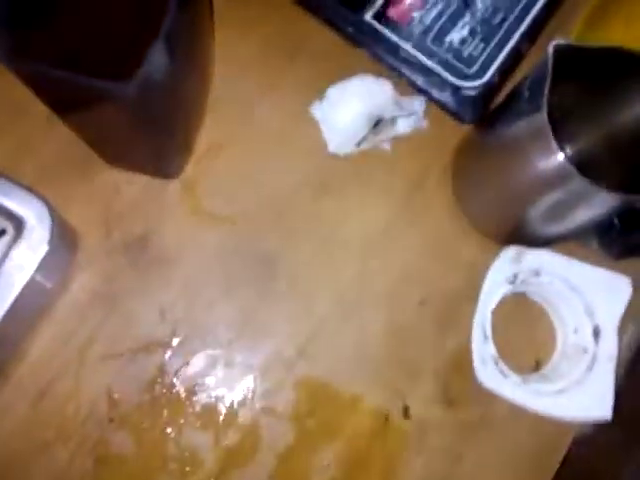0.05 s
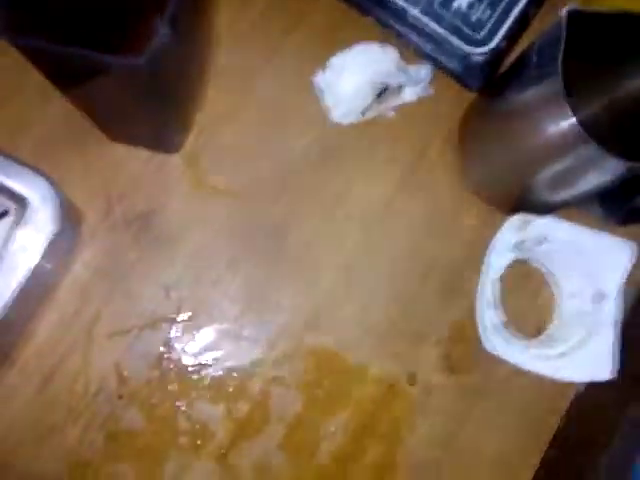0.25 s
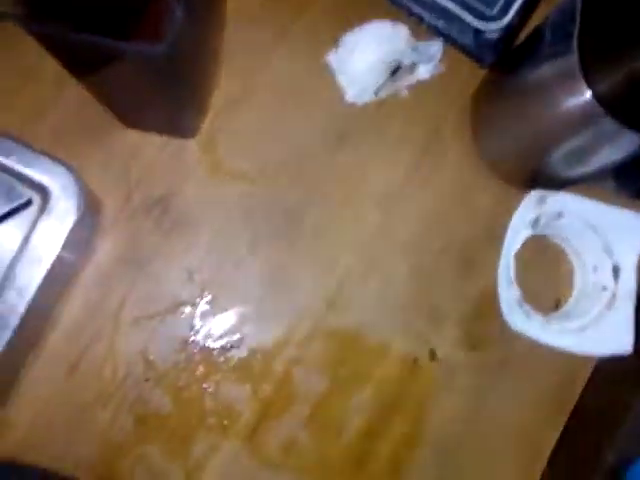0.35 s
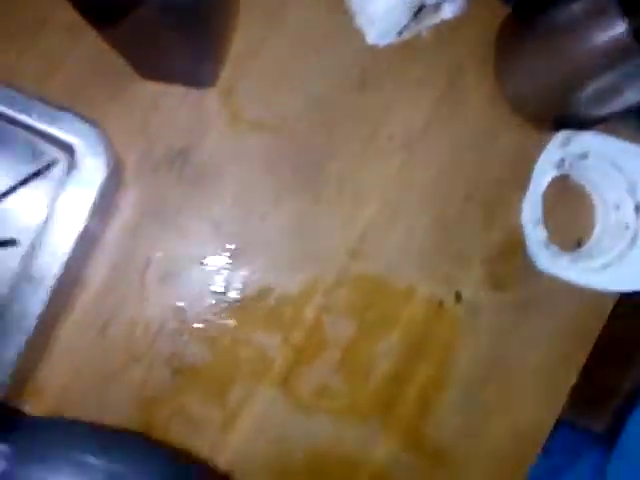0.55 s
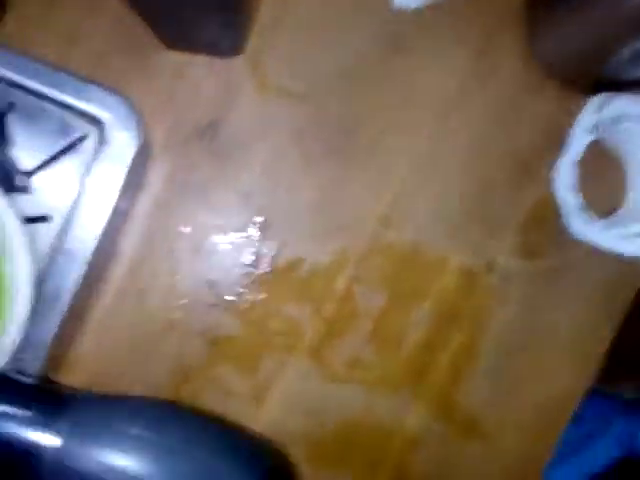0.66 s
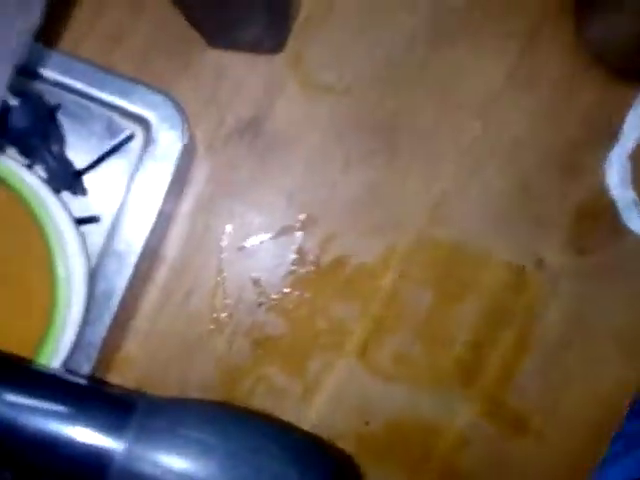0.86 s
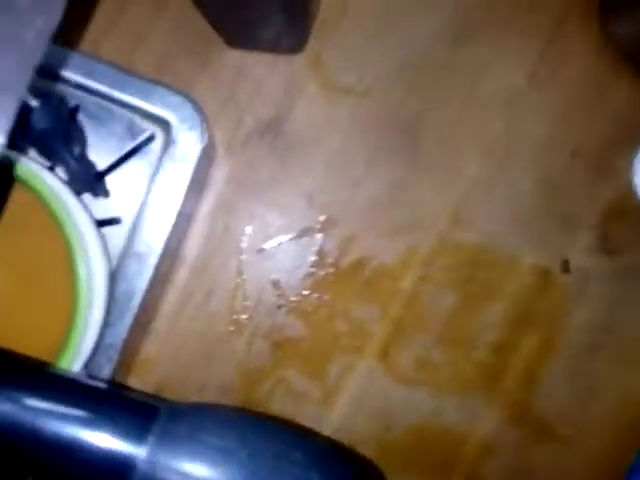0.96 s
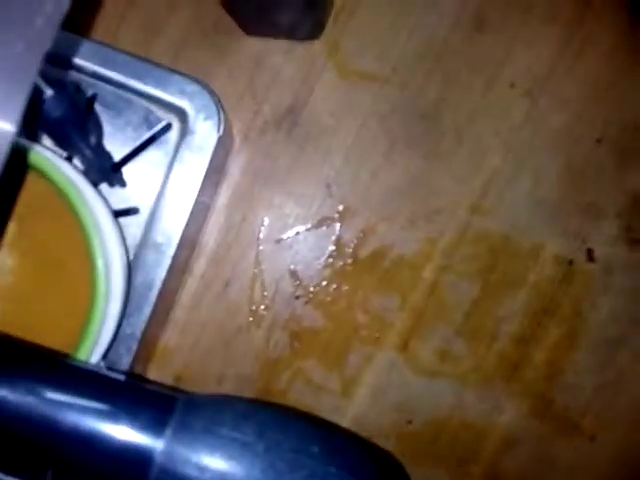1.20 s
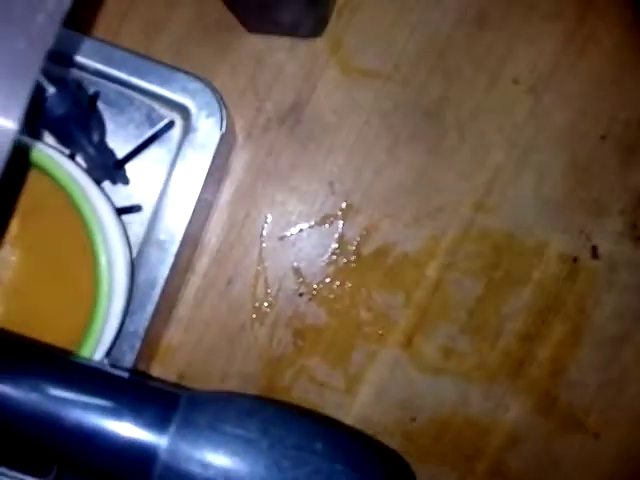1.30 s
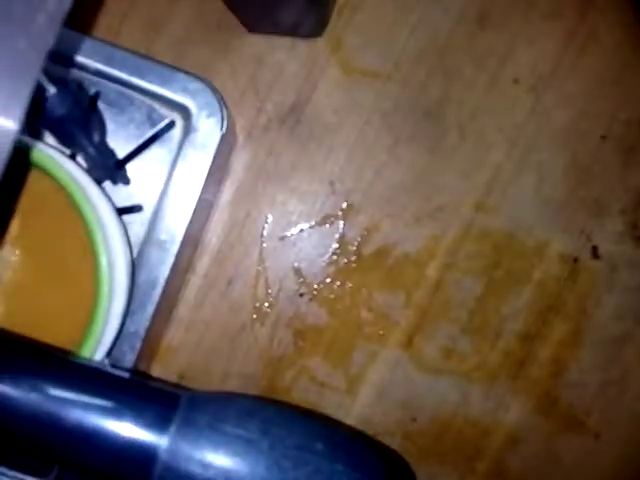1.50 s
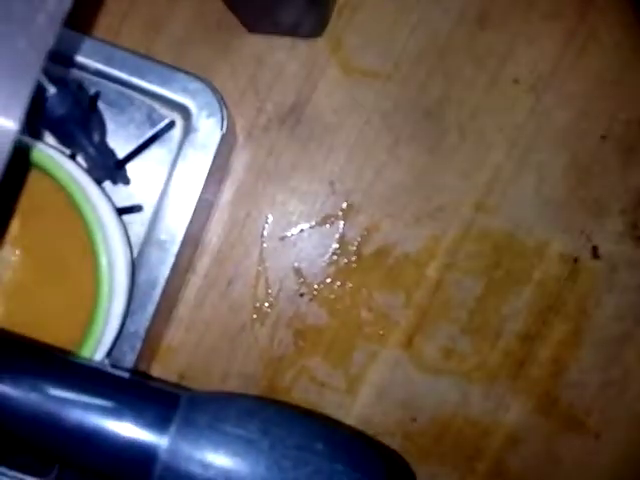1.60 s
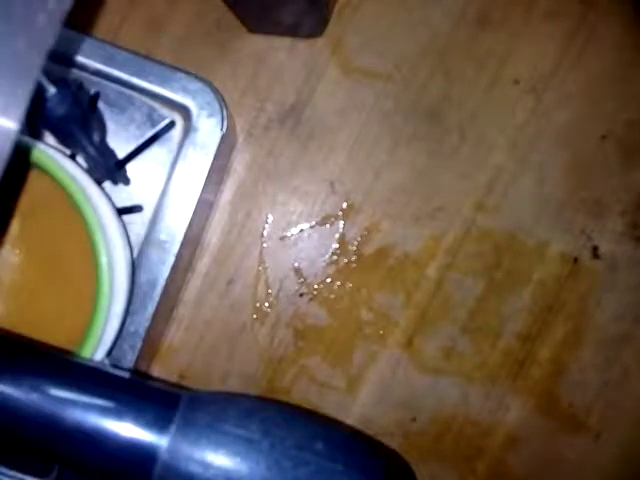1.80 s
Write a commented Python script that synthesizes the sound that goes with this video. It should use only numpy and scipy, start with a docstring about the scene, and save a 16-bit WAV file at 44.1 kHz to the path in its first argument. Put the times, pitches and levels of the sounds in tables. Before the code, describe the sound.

A portable espresso maker hisses and spurts coffee, then knocks twice over a steady machine hum.

```python
"""Air seeps softly from a small portable espresso maker, handled close by over a kitchen counter.
The leak opens into a hissing jet, and coffee makes the stream sputter and gurgle in four spurts.
Before and after, the housing bumps and its plastic edges tick; a last firm knock pings a metal rim
and sets a hollow part ringing. A machine hums in the room throughout."""
import sys
import numpy as np
from scipy import signal
from scipy.fft import rfft, irfft, next_fast_len
from scipy.io import wavfile
from scipy.ndimage import map_coordinates

SR = 44100
rng = np.random.default_rng(int(sys.argv[2]) if len(sys.argv) > 2 else 0)


def wav_record(signal):
    """Record a signal, one row per channel, as 16-bit PCM in the file named by sys.argv[1]."""
    frames = np.transpose(np.atleast_2d(signal))
    bounded = np.clip(frames, -1, 1)
    # unit amplitude maps onto the largest positive 16-bit level
    quanta = np.round(bounded * 32767).astype(np.int16)
    wavfile.write(sys.argv[1], SR, quanta)


N = 81585
T = np.arange(N) / SR


def amp(db):
    """Decibels to gain."""
    return 10 ** (np.asarray(db) / 20)


def unit(x):
    """Scaled to rms 1."""
    return x / np.sqrt(np.mean(x ** 2) + 1e-20)


def curves(rows):
    """One value per sample for each column after the time."""
    times, *columns = np.transpose(rows)
    return [np.interp(T, times, column) for column in columns]


def colour(points, hz):
    """Gain of (frequency [Hz], level [dB]) points on a log axis."""
    f, db = np.transpose(points)
    return amp(np.interp(np.log(hz + 1), np.log(f), db))


def filtered(x, response):
    """x through a complex frequency response."""
    size = next_fast_len(N + SR // 2)
    return irfft(rfft(x, size) * response(np.fft.rfftfreq(size, 1 / SR)), size)[:N]


def noise(points):
    """Coloured noise, rms 1."""
    return unit(filtered(rng.standard_normal(N), lambda f: colour(points, f)))


def narrow(hz, width_hz):
    """Noise in one resonance, rms 1."""
    return unit(filtered(rng.standard_normal(N), lambda f: 1 / (1 + ((f - hz) / width_hz * 2) ** 2)))


def wobble(knots_per_s):
    """Smooth random curve."""
    return map_coordinates(rng.standard_normal(int(N * knots_per_s / SR) + 4), [T * knots_per_s])


def decay(start_s, t60_s):
    """Exponential decay from start_s."""
    return (T >= start_s) * np.exp(-np.log(1000) * np.maximum(T - start_s, 0) / t60_s)


def tone(hz, width_hz):
    """Sine wavering in pitch and level, rms 1."""
    gain = amp(2.37 * wobble(22))
    wavering_hz = hz + width_hz / 2 * wobble(44.86)
    return unit(gain * np.sin(2 * np.pi * np.cumsum(wavering_hz) / SR))


def hiss(flutter_db=1.5):
    """All that escapes; liquid makes the open stream flutter."""
    stream = opening() + jet() + spurts()
    flutter = unit(amp(flutter_db * wobble(950)))
    return stream * flutter + leak() + fizz()


# jet flow: (time [s], level [dB])
JET_FLOW = [(.59, -63), (.62, -43), (.655, -44.5), (.70, -36), (.765, -43), (.795, -46.5), (.83, -41.5),
            (.88, -45), (.925, -43.5), (.955, -58.5), (.99, -79)]
# jet spectrum: (frequency [Hz], level [dB])
JET_SPECTRUM = [(300, -7), (1200, 7), (2500, 1.5), (4200, 3), (6000, -3), (7000, -6), (8300, -19),
                (12000, -21.5), (14000, -13), (15000, -5.5), (15500, -14)]

def jet():
    """Air and coffee rush through the open gap."""
    gate = (T > JET_FLOW[0][0]) * (T < JET_FLOW[-1][0])
    return amp(curves(JET_FLOW)[0]) * noise(JET_SPECTRUM) * gate


# surges: (crest time [s], level [dB], rise [s], fall [s], gurgle pitch [Hz], gurgle re spray [dB])
SURGES = [(0.629, -26.5, 0.0063, 0.0096, 615, -6.5), (0.679, -26.5, 0.0076, 0.0078, 240, -4),
          (0.747, -31.5, 0.013, 0.019, 300, -8), (0.841, -34, 0.0073, 0.033, 384, -10)]
# spray spectrum: (frequency [Hz], level [dB])
SPRAY_SPECTRUM = [(40, -18), (70, 1.5), (180, 4), (420, 2.5), (620, -4.5), (1300, -5.5), (2600, 1),
                  (4000, -6.5), (6000, -10.5), (7200, -16.5), (8400, -24), (13500, -25.5), (15000, -14),
                  (15500, -8)]

def spurts():
    """Coffee surges out as spray with a narrow gurgle."""
    spray, out = noise(SPRAY_SPECTRUM), np.zeros(N)
    for crest_s, db, rise_s, fall_s, gurgle_hz, gurgle_db in SURGES:
        surge = amp(db) * np.exp(-.5 * ((T - crest_s) / np.where(T < crest_s, rise_s, fall_s)) ** 2)
        out += surge * (spray + amp(gurgle_db) * narrow(gurgle_hz, width_hz=76))
    return out


# flow as the gap opens: (time [s], level [dB])
GAP_FLOW = [(.474, -65), (.488, -43), (.54, -44.5), (.61, -42), (.64, -53)]
# gap resonances: (frequency [Hz], level [dB])
GAP_SPECTRUM = [(300, -15), (1200, 5.5), (2500, -4), (3900, -1.5), (5100, -9.5), (6200, -6.5), (7500, -21),
                (8300, -33), (9300, -18), (10000, -30), (10700, -28), (11600, -19), (13300, -19),
                (14000, -16), (15100, -11.5)]

def opening(rise_per_s=.45):
    """Thin, whistly hiss; its resonances drift upward as the gap changes shape."""
    times = [s for s, db in GAP_FLOW]
    speed = np.clip(1 + rise_per_s * (T - np.mean(times)), .5, 2)
    gliding = map_coordinates(noise(GAP_SPECTRUM), [np.cumsum(speed)], order=5, mode="mirror")
    return amp(curves(GAP_FLOW)[0]) * gliding * (T > times[0]) * (T < times[-1])


# leak flow: (time [s], level [dB])
LEAK_FLOW = [(0, -43), (.12, -47), (.15, -44.5), (.23, -47), (.255, -52.5), (.31, -45.5), (.40, -48.5),
             (.47, -46), (.51, -45), (.9, -73), (1.0, -110)]
# leak spectrum: (frequency [Hz], level [dB])
LEAK_SPECTRUM = [(800, 3), (1700, 8.5), (2700, 0), (3300, -4.5), (4000, -4), (5000, -26), (6500, -22),
                 (8000, -48.5), (13000, -36.5), (15200, -32.5)]

def leak():
    """Air seeps out softly."""
    return amp(curves(LEAK_FLOW)[0]) * noise(LEAK_SPECTRUM)


# sizzle spectrum: (frequency [Hz], level [dB])
FIZZ_SPECTRUM = [(2000, -13), (5500, -2.5), (8500, -24), (9500, -26), (11400, -9), (14000, -15), (15000, 3),
                 (15500, -1)]

def fizz(start_s=.14, end_s=.236, edge_s=.014, db=-56.5):
    """A thin first sizzle."""
    gate = np.clip(np.minimum(T - start_s, end_s - T) / edge_s + 1, 0, 1)
    return amp(db) * gate * noise(FIZZ_SPECTRUM)


# housing contacts: (time [s], peak [dB], contact time [s], body pitch [Hz], t60 [s])
HOUSING_CONTACTS = [(0.221, -32, 0.0037, 30, 0.11), (0.236, -1, 0.00019, 141, 0.027),
                    (0.2401, -13.5, 0.00054, 70, 0.022), (0.254, -31, 0.0017, 79, .03),
                    (0.399, -17.5, 0.00028, 225, 0.09), (.409, -13.5, 0.00029, 149.6, 0.039),
                    (0.4203, -14, 0.00069, 376, 0.0093), (0.459, -24.5, 0.00079, 148, 0.016),
                    (.479, -16.5, 0.00044, 324, 0.01), (0.483, -23.5, 0.0017, 111, 0.027),
                    (1.04, -9, 0.00029, 189, 0.026), (1.048, -18, 0.0012, 105, 0.049),
                    (1.1205, -7, 0.00055, 183, 0.069), (1.147, -17, 0.0013, 138.8, 0.03)]

def bumps():
    """Each contact is one short push that rocks the heavily damped housing."""
    out = np.zeros(N)
    for start_s, db, contact_s, hz, t60_s in HOUSING_CONTACTS:
        width_hz = np.log(1000) / (np.pi * t60_s)
        push = lambda f: np.exp(-2 * np.pi * f * (contact_s + 1j * start_s))
        body = lambda f: f * f / (f * f - hz * hz - 1j * f * width_hz)
        bump = filtered(np.ones(1), lambda f: push(f) * body(f))
        out += amp(db) * bump / np.abs(bump).max()
    return out


# edge contacts: (time [s], peak [dB], low-pass corner [Hz], t60 [s], sparkle gain [dB])
EDGE_CONTACTS = [(0.2374, -41.5, 13900, .002, -18), (0.2393, -21, 1800, 0.0053, -22),
                 (0.398, -18, 2000, 0.016, -21), (.399, -18, 14000, 0.005, 2),
                 (0.4175, -18, 1820, 0.0036, -20), (.420, -41, 9000, 0.073, 10),
                 (1.0438, -30.5, 4610, 0.023, -20), (1.0488, -38.5, 14200, .005, -9),
                 (1.1192, -22, 1500, 0.014, -19), (1.1237, -20.5, 4000, .004, 8),
                 (1.128, -29, 2500, 0.069, -9), (1.44, -43, 1800, 0.017, -17)]
# plastic response: (frequency [Hz], level [dB])
PLASTIC_SPECTRUM = [(300, -24), (1000, 8), (2500, 2.5), (5200, 5.5), (6200, -12.5), (8000, -24), (9300, -4),
                    (15500, -7)]

def ticks(grit_db=-19.5, sparkle_hz=15000, sparkle_width_hz=900):
    """Hard plastic edges touch: a snap and a short gritty crack."""
    out = np.zeros(N)
    for start_s, db, corner_hz, t60_s, sparkle_db in EDGE_CONTACTS:
        snap = amp(grit_db) * rng.standard_normal(N) * decay(start_s, t60_s)
        snap[round(start_s * SR)] = 1
        sparkle = lambda f: amp(sparkle_db) / (1 + 2j * (f - sparkle_hz) / sparkle_width_hz)
        lowpass = lambda f: 1 / (1 + 1j * f / corner_hz) ** 2
        crack = filtered(snap, lambda f: (colour(PLASTIC_SPECTRUM, f) + sparkle(f)) * lowpass(f))
        out += amp(db) * crack / np.abs(crack).max()
    return out


# blows on the hollow part: (time [s], level [dB])
HOLLOW_BLOWS = [(1.1295, -14), (1.1425, -16)]
# its modes: (frequency [Hz], level re blow [dB], t60 [s])
HOLLOW_MODES = [(499.4, -5, 0.11), (552, -5.5, 0.044), (638, -4.5, 0.13), (680, -1.5, 0.1),
                (754, -2.5, 0.07), (842, -6.5, 0.12), (1152, -25.5, .066), (2140, -25.5, 0.092),
                (2375, -33, .08), (3520, -37.5, 0.081)]

def hollow_ring(attack_s=.0016):
    """The last knock rattles the hollow part into its modes."""
    out = np.zeros(N)
    for start_s, blow_db in HOLLOW_BLOWS:
        age_s = np.maximum(T - start_s, 0)
        attack = 1 - np.exp(-age_s / attack_s)
        for hz, mode_db, t60_s in HOLLOW_MODES:
            envelope = amp(blow_db + mode_db + rng.normal(0, 1)) * decay(start_s, t60_s) * attack
            out += envelope * np.sin(2 * np.pi * (hz * age_s + rng.random()))
    return out


# metal rim modes: (frequency [Hz], level [dB], t60 [s])
RIM_MODES = [(5210, -30.5, 0.028), (4840, -23, 0.0066), (5900, -44, 0.009)]

def rim_ping(start_s=1.1236):
    """A metal rim touches during the last knock."""
    return sum(amp(db) * decay(start_s, t60_s) * np.sin(2 * np.pi * hz * (T - start_s))
               for hz, db, t60_s in RIM_MODES)


# hum swells: (time [s], rush level [dB], tone gain [dB])
HUM_LEVELS = [(0, -42, -57), (.08, -42.5, -38), (.2, -42.5, -49.5), (.4, -40.5, -44.5), (.6, -36.5, -36.5),
              (.8, -39, -36), (.92, -41, -41.5), (.98, -39, -28.5), (1.06, -37, -40.5), (1.15, -37.5, -39),
              (1.35, -40, -38.5), (1.55, -38, -38), (1.85, -39, -39.5)]
# air rush spectrum: (frequency [Hz], level [dB])
RUSH_SPECTRUM = [(250, -22), (330, -4.5), (500, -4), (620, -1.5), (720, -2), (870, 0), (1000, -3),
                 (1170, -6), (1300, -11), (1600, -17.5), (1800, -23.5), (2200, -39.5), (2600, -25.5),
                 (3300, -52), (3900, -40), (5500, -43.5), (6500, -51.5), (8500, -59), (13500, -59),
                 (15000, -54.5)]
# hum tones: (frequency [Hz], relative level [dB], width [Hz])
HUM_LINES = [(889.4, -1, 14.7), (693, -11.5, 12.1), (1161, -13, 19.2), (1128, -28.5, 6.4),
             (1721, -21.5, 40)]
# casing resonances: (frequency [Hz], level at the final rush level [dB], width [Hz])
CASING_MODES = [(2715, -64.5, 97), (4337, -74, 110), (5173, -73, 370), (6820, -84.5, 130)]

def hum(waver_db=2.5):
    """Fan-like machine: rushing air, wavering tones, casing resonances that follow the rush."""
    rush_db, tones_db = curves(HUM_LEVELS)
    tones = sum(amp(db) * tone(hz, width_hz) for hz, db, width_hz in HUM_LINES)
    casing = sum(amp(db + waver_db * wobble(14)) * narrow(hz, width_hz)
                 for hz, db, width_hz in CASING_MODES)
    rush = amp(rush_db) * noise(RUSH_SPECTRUM)
    return rush + amp(tones_db) * tones + amp(rush_db - rush_db[-1]) * casing


# whirr path: (time [s], centre [Hz], level [dB])
WHIRR_PATH = [(0, 907.5, -77), (.3, 926, -44), (.6, 955.3, -41.5), (.85, 966.5, -35), (1.05, 900, -36.5),
              (1.3, 780, -34), (1.5, 841.5, -38), (1.65, 815.5, -36), (1.85, 854, -42)]

def whirr(width_hz=182):
    """A broad resonance of the machine drifts in pitch."""
    hz, db = curves(WHIRR_PATH)
    phase = 2 * np.pi * np.cumsum(hz) / SR
    return amp(db) * unit(narrow(0, width_hz) * np.sin(phase) + narrow(0, width_hz) * np.cos(phase))


# drone path: (time [s], pitch [Hz], level [dB])
DRONE_PATH = [(0, 181, -54.5), (.93, 188, -55), (.99, 212.9, -41), (1.1, 203.4, -37.5), (1.2, 193.6, -36.5),
              (1.28, 192.6, -40.5), (1.34, 190.5, -54.5), (1.85, 190, -54.5)]

def drone():
    """A low machine tone swells around the last knocks."""
    hz, db = curves(DRONE_PATH)
    return amp(db) * tone(hz, width_hz=11.8)


# room bass: (time [s], level [dB])
BASS_LEVELS = [(0, -48.5), (.2, -43.5), (.35, -40.5), (.8, -48), (1.0, -41.5), (1.2, -37), (1.35, -45.5),
               (1.85, -46)]
# its spectrum: (frequency [Hz], level [dB])
BASS_SPECTRUM = [(20, -26), (50, -15.5), (80, -5), (110, -0.5), (160, -0.5), (200, -2.5), (260, -8),
                 (400, -15.5), (800, -34), (2000, -81)]

def rumble():
    """Room bass swells and settles."""
    return amp(curves(BASS_LEVELS)[0]) * noise(BASS_SPECTRUM)


def room(x, db=-38.5, delay_s=.0085, t60_s=.1, corner_hz=2500):
    """The short tail of a small kitchen."""
    reflections = rng.standard_normal(N) * decay(delay_s, t60_s)
    tail = filtered(reflections, lambda f: 1 / (1 + 1j * f / corner_hz))
    return amp(db) * signal.fftconvolve(x, tail / np.linalg.norm(tail))[:N]


def scene():
    """Hiss, handling noises and machine, in mono."""
    knocks = bumps() + ticks() + hollow_ring() + rim_ping()
    return (hiss() + knocks + room(knocks) + hum() + whirr() + drone() + rumble())[None]


TOP_HZ = 15600

def record(dry):
    """Steep low-pass at the band limit."""
    return filtered(dry[0], lambda f: 1 / (1 + (f / TOP_HZ) ** 160))[None]


dry = scene()
out = record(dry)
wav_record(out)
```